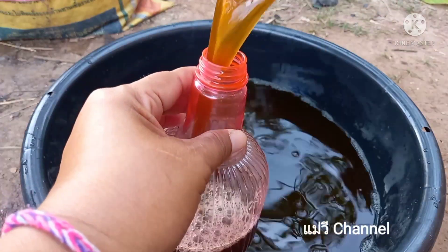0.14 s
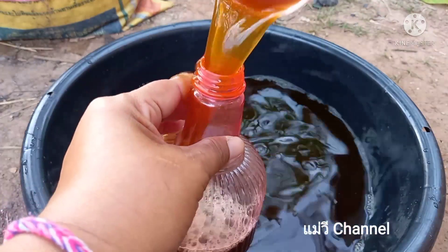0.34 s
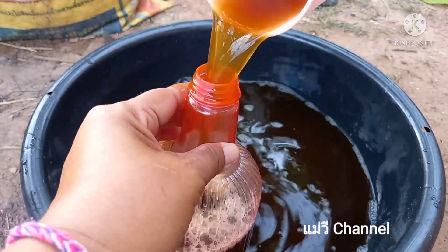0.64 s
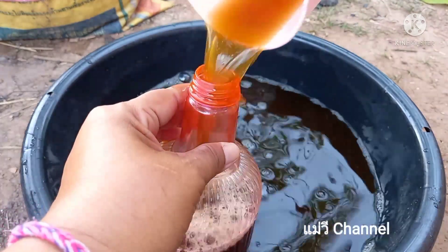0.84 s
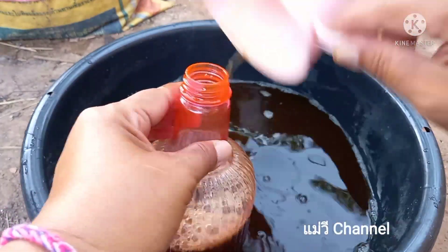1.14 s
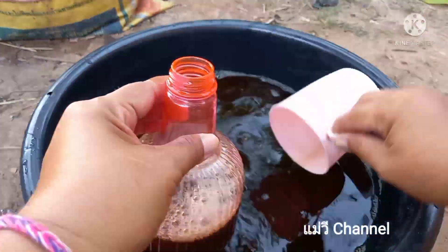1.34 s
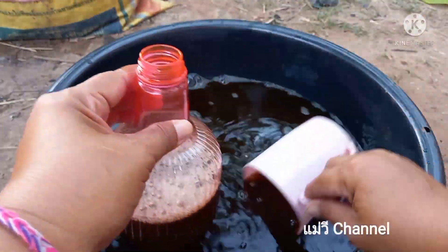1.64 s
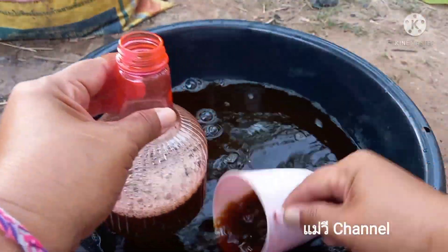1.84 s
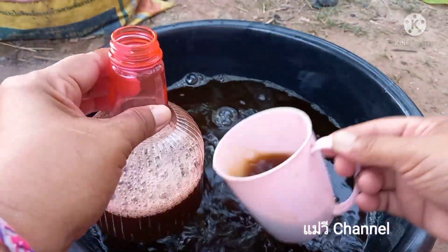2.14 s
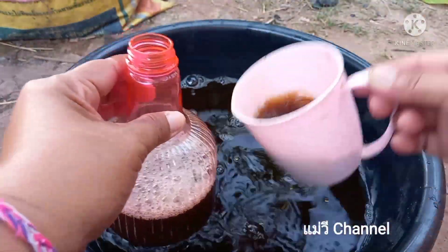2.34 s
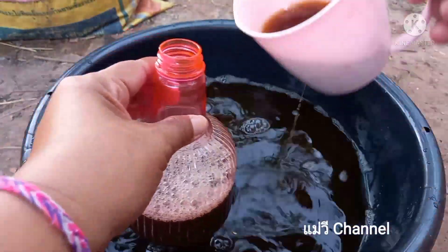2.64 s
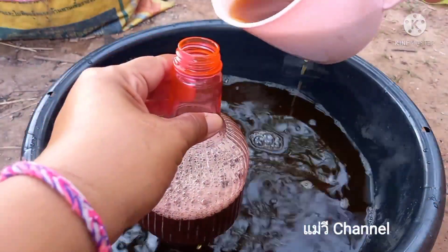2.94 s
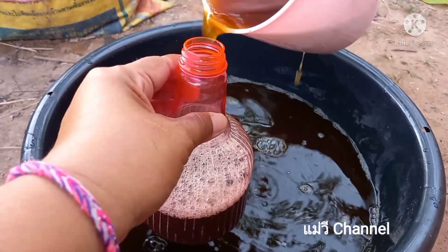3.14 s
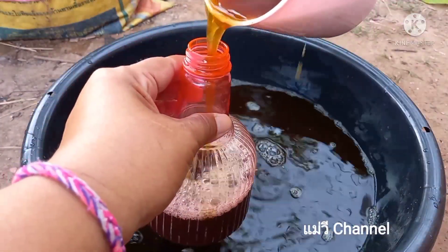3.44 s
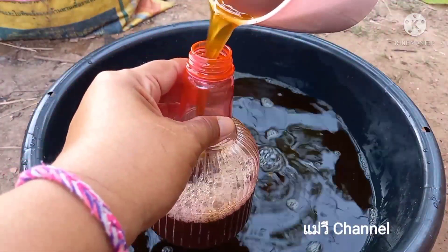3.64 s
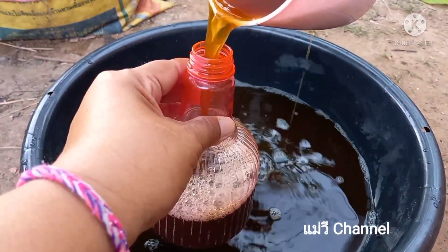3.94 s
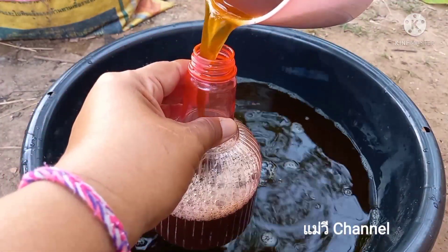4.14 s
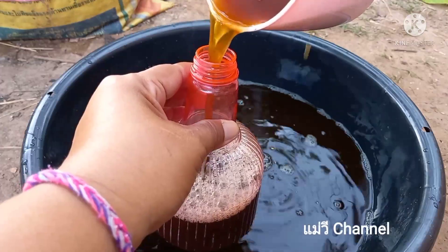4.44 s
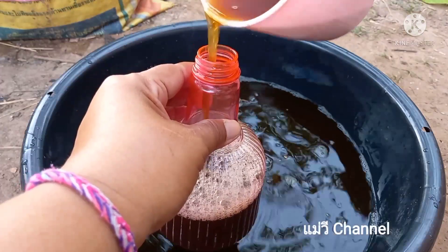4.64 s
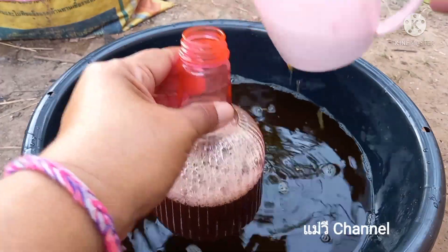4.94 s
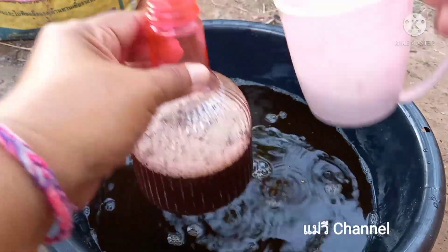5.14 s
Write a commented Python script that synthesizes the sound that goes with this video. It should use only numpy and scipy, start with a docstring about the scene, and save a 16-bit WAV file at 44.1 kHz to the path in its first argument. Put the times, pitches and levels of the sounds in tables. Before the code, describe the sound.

Liquid pours bubbling and splashing into a plastic bottle, a scoop dunks and drips in a basin, then a second, duller pour follows outdoors.

```python
"""Outdoors, at a basin: soapy liquid runs from a plastic scoop into a spray bottle, close to a two-port microphone.
From the start the first pour bubbles, splashes and crackles for over a second, while wind buffets the right port.
Then the scoop is dunked and gulps (1.7 to 1.9 s), runs off and drips; from 3.4 s to 5 s the second pour follows.
Further off, a bird chirps at 0.7, 2.3 and 5.2 s, and a faint insect comes and goes from 2.7 s.
Bubbles are gliding sines, splashes, foam and wind are filtered noise, and the bottle is a set of resonances."""
import sys
import numpy as np
from scipy import signal
from scipy.fft import rfft, irfft
from scipy.io import wavfile
from scipy.ndimage import uniform_filter1d

SR = 44100
rng = np.random.default_rng(int(sys.argv[2]) if len(sys.argv) > 2 else 0)


def wav_record(signal):
    """Record a signal, one row per channel, as 16-bit PCM in the file named by sys.argv[1]."""
    frames = np.transpose(np.atleast_2d(signal))
    bounded = np.clip(frames, -1, 1)
    # unit amplitude maps onto the largest positive 16-bit level
    quanta = np.round(bounded * 32767).astype(np.int16)
    wavfile.write(sys.argv[1], SR, quanta)


N = 232616
T = np.arange(N) / SR  # s


def undb(db):
    """Decibels to gain."""
    return 10 ** (np.asarray(db) / 20)


def unit(x):
    """Scale to rms 1."""
    return x / np.sqrt(np.mean(x ** 2))


def pan(db):
    """Gains of the two ports for a left-minus-right level in dB."""
    return undb(np.array([[db], [-db]]) / 2)


def add(out, s, x):
    """Mix a short sound into out at time s."""
    i = int(np.clip(s * SR, 0, N - 1))
    out[..., i:i + x.shape[-1]] += x[..., :N - i]


def curve(rows, axis=1):
    """Gain over time from a dB column; practically silent outside its span."""
    rows = np.array(rows)
    return undb(np.interp(T, rows[:, 0], rows[:, axis], left=-120, right=-120))


def swell(start, length, attack, release):
    """Gain over time: it rises, holds, then falls by 60 dB in the release time."""
    age = T - start
    return np.clip(age / attack, 0, 1) * undb(-60 * np.maximum(age - length, 0) / release)


def walk(rate):
    """Slow random wandering, spread a little under 1, with rate new values a second."""
    k = int(SR / rate)
    return uniform_filter1d(np.repeat(rng.standard_normal(N // k + 1), k), k)[:N]


def uneven(start, length, rate, count=64):
    """Loosely spaced moments, each with two chance values: rows (s, chance, chance)."""
    rows = rng.standard_normal((count, 3))
    rows[:, 0] = start + (np.arange(count) + .5 + np.tanh(rows[:, 0]) / 2) / rate
    return rows[rows[:, 0] < start + length]


def colour(x, points, size=2048):
    """Causal minimum-phase filter shaped by (hz, level_db) points; white noise keeps its power."""
    hz, db = np.transpose(points)
    f = np.maximum(np.arange(size // 2 + 1) * SR / size, 1)
    cepstrum = irfft(np.log(undb(np.interp(np.log(f), np.log(hz), db))))
    # folding the cepstrum forward makes the response causal
    cepstrum[1:size // 2] *= 2
    cepstrum[size // 2 + 1:] = 0
    response = irfft(np.exp(rfft(cepstrum)))
    return signal.fftconvolve(x, response[None] / np.linalg.norm(response))[:, :x.shape[1]]


def resonate(x, hz, width):
    """One resonance, gain 1 at its centre, width in Hz."""
    return signal.lfilter(*signal.iirpeak(hz, hz / width, fs=SR), x)


def fade(t60, rise, size=6000):
    """Time axis and an envelope that swells and dies away, peak 1."""
    t = np.arange(size) / SR
    env = (1 - np.exp(-t / rise)) * np.exp(-np.log(1000) * t / t60)
    return t, env / env.max()


def bubble(hz, t60, glide, rise, size=6000):
    """A ringing pocket of air; its pitch climbs by the glide share as it nears the surface."""
    t, env = fade(t60, rise, size)
    cycles = hz * np.cumsum(1 + glide * np.minimum(t / t60, 1)) / SR
    return env * np.sin(2 * np.pi * cycles)


def burst(t60, rise):
    """A short spatter of noise."""
    t, env = fade(t60, rise)
    return env * rng.standard_normal(len(t))


def wide_burst(t60, rise):
    """A spatter that differs at the two ports."""
    return np.array([burst(t60, rise) for _ in range(2)])


def swarm(rate, lo_hz, hi_hz, cycles, spread_db, lag_ms, count=9000, size=900):
    """Many small bubbles of uneven size swell over their first cycles and reach the right port a little late."""
    when, pitch, place, strength = rng.random((count, 4)).T[:, :int(rate * N / SR), None]
    hz = lo_hz * (hi_hz / lo_hz) ** pitch
    gain = undb(-spread_db * np.log(np.maximum(strength, .02))) * np.sqrt(hz)
    where = ((when * N).astype(int) + np.arange(size)).ravel()
    out = []
    for lag in (0, lag_ms / 1000 * place):
        turns = hz * np.maximum(np.arange(size) / SR - lag, 0)
        env = (1 - np.exp(-(turns / 2) ** 2)) * np.exp(-np.log(1000) * turns / cycles)
        climb = 1 + .035 * turns / cycles
        rings = gain * env * np.sin(2 * np.pi * turns * climb)
        out.append(np.bincount(where, rings.ravel(), N)[:N])
    return np.array(out)


def steady(x, span=0.078):
    """Hold the mean power near 1 while single grains still stand out; span in s."""
    power = uniform_filter1d(np.mean(x ** 2, axis=0), int(span * SR))
    return x / np.sqrt(power + np.mean(power) / 100)


def ports(x, turn_hz=3000):
    """A close sound at both ports: the lows alike, the treble lagging in phase on the right (an all-pass)."""
    low = signal.lfilter(*signal.butter(1, turn_hz, fs=SR), x)
    return np.array([x, 2 * low - x])


# colour of the distant air: hz, level_db
AIR_COLOUR = [(18, -19), (30, -5.5), (114, 4.5), (164, -9.5), (230, -5.5), (575, -25), (4310, -41.5),
              (5450, -44), (6540, -47.5), (7460, -44.5), (15500, -42.5)]
# the insect's swelling and fading: start_s, level_db (before a random flicker)
INSECT_LEVEL = [(2.7, -94), (3.05, -79.5), (3.45, -71), (3.8, -94), (4.7, -76), (5.2, -78)]
AIR_DB = -50.5


def outdoors():
    """Distant murmur of the air, alike on both ports in the bass, and a faint high insect of narrow noise."""
    mid, side = colour(rng.standard_normal((2, N)), AIR_COLOUR)
    wide = signal.lfilter(*signal.butter(1, 1200, "high", fs=SR), side) + 0.35 * side
    left_right = np.array([[1], [-1]]) * wide / np.std(side)
    air = undb(AIR_DB + walk(7.7)) * (unit(mid) + left_right)
    trill = resonate(rng.standard_normal((2, N)), 6600, 520)
    trill = unit(resonate(trill, 6600, 520))
    return air + trill * curve(INSECT_LEVEL) * undb(1.3 * walk(23))


# bird calls further off: start_s, level_db (before the smearing)
BIRD_CALLS = [(0.655, -41.5), (2.349, -44.5), (5.239, -46.5)]
# pitch path of one call: after_start_s, pitch_hz
CALL_PITCH = [(0, 6550), (0.015, 6925), (0.027, 6030), (.048, 4750), (0.079, 3900)]


def bird():
    """Thin, slightly hoarse falling chirps, smeared by the trees they pass through."""
    song = np.zeros(N)
    after, hz = np.transpose(CALL_PITCH)
    t = np.arange(int(after[-1] * SR)) / SR
    for s, db in BIRD_CALLS:
        pitch = np.interp(t, after, hz) * (1 + .04 * walk(1500)[:len(t)])  # the wobble makes it hoarse
        env = np.minimum(t / 0.016, 1) * (1 - t / after[-1])
        add(song, s, undb(db) * np.sin(2 * np.pi * np.cumsum(pitch) / SR) * env)
    t, env = fade(t60=0.36, rise=0.0096, size=16000)
    trees = env * rng.standard_normal((2, len(t))) / np.linalg.norm(env)
    return undb(-2) * song + signal.fftconvolve(song[None], trees)[:, :N]


# strong eddies hitting the right port: start_s, level_db (before panning), pitch_hz
BUFFET_EDDIES = [(0.047, -19.5, 106), (0.076, -17.5, 84), (0.165, -21.5, 61), (0.2, -16, 97),
                 (0.27, -26, 86), (0.349, -19, 89), (0.55, -33.5, 62), (0.775, -29.5, 84),
                 (0.839, -32.5, 78.6), (2.167, -31, 66.4), (2.442, -24.5, 64.1), (2.645, -28, 74)]
# gusts: start_s, length_s, rumble level_db (before panning)
WIND_GUSTS = [(-0.04, 0.26, -30.5), (.66, 0.12, -45.5), (2.092, 0.358, -46.5), (2.87, .06, -55)]
# colour of the wind rumble: hz, level_db
WIND_COLOUR = [(22, -19), (50, 1.5), (85, 2.5), (130, 1.5), (180, -6), (260, -12.5), (350, -36.5),
               (1200, -77.5)]
GUST_ATTACK_S, GUST_RELEASE_S, CALM_DB = 0.013, 1.14, -65
EDDIES_PER_S, EDDY_DB, EDDY_HZ = 19, -36, 71  # weak eddies in every gust: mean level and middle pitch


def wind():
    """Gusts rumble on each port, more on the right; single eddies shake the right one for a cycle or two."""
    eddies = np.zeros((1, N))
    t = np.arange(SR // 10) / SR
    weak = []
    for start, length, _ in WIND_GUSTS:
        for s, force, pitch in uneven(start, length, EDDIES_PER_S):
            if s > 0:
                weak.append((s, EDDY_DB + 2 * force, EDDY_HZ * np.exp(.15 * pitch)))
    for s, db, hz in BUFFET_EDDIES + weak:
        age = t / 0.0077
        push = (age * np.exp(1 - age)) ** 2
        add(eddies, s, undb(db) * push * np.sin(2 * np.pi * (hz * t + rng.random())))
    flutter = uniform_filter1d(np.abs(eddies), SR // 100) * colour(rng.standard_normal((1, N)), WIND_COLOUR)
    strength = undb(CALM_DB)
    for s, length, db in WIND_GUSTS:
        strength = strength + undb(db) * swell(s, length, GUST_ATTACK_S, GUST_RELEASE_S)
    rumble = colour(rng.standard_normal((2, N)), WIND_COLOUR) * strength
    return undb(-3.5) * pan(-28.5) * (eddies + .5 * flutter) + pan(-10.5) * rumble


# single drops into basin or bottle: start_s, level_db, bubble pitch_hz, tick level_db (levels relative)
SINGLE_DRIPS = [(1.3064, -40, 5530, -52.5), (1.3874, -37, 8200, -52), (1.5741, -38.5, 3960, -50),
                (1.611, -37, 8650, -46.5), (2.1395, -28.5, 3030, -34.5), (2.1748, -28, 3890, -45),
                (2.2371, -19.5, 8400, -48), (2.2468, -27, 9700, -40.5), (2.262, -42, 3030, -36),
                (2.3007, -44, 3122, -43.5), (2.6657, -40, 3090, -61), (2.8725, -39, 1734, -55),
                (3.1565, -38.5, 3115, -65), (3.4423, -37, 2580, -56.5), (3.553, -33.5, 7300, -57.5),
                (4.156, -34.5, 2340, -54), (4.8678, -43, 1910, -68)]
# colour of a drop's impact: hz, level_db
TICK_COLOUR = [(1500, -11.5), (3000, -1.5), (6000, 0.5), (8500, 2.5), (13000, 4.5), (15500, -3.5)]
# a run of drops off the scoop: mean levels (relative, as above) and middle pitch
RUNOFF_S, RUNOFF_LENGTH_S, RUNOFF_PER_S = 2.13, .19, 70
RUNOFF_DB, RUNOFF_TICK_DB, RUNOFF_SCATTER_DB, RUNOFF_HZ = -41, -51, 3, 3600


def drips():
    """A drop ticks on the surface, then its bubble pings upward while a little spray settles."""
    pings, ticks = np.zeros(N), np.zeros(N)
    runoff = []
    for s, force, pitch in uneven(RUNOFF_S, RUNOFF_LENGTH_S, RUNOFF_PER_S):
        scatter_db = RUNOFF_SCATTER_DB * force
        hz = RUNOFF_HZ * np.exp(np.tanh(pitch) / 2)
        runoff.append((s, RUNOFF_DB + scatter_db, hz, RUNOFF_TICK_DB + scatter_db))
    for s, db, hz, tick_db in SINGLE_DRIPS + runoff:
        t60 = .017 * (3000 / hz) ** .6  # small bubbles die sooner
        add(pings, s, undb(db - 3) * bubble(hz, t60, glide=.3, rise=.0008))
        add(ticks, s, undb(tick_db + 5) * burst(t60=.006, rise=.0004))
        add(ticks, s, undb(tick_db - 8) * burst(t60=.03, rise=.0015))
    both = np.array([ticks, np.roll(ticks, 1)])  # one sample later on the right
    return ports(pings, turn_hz=6600) + colour(both, TICK_COLOUR)


# modes of the scoop's wall and hollow: hz, level_db, t60_s
SCOOP_MODES = [(1090, 0, .03), (1680, -1, .016), (2520, -13, .03), (3000, -9, .03), (4160, -15, .016),
               (5400, -19, .012), (8150, -19, .012)]


def scoop_wall():
    """One knock on the plastic: its wall and hollow ring together."""
    return sum(undb(db) * bubble(hz, t60, glide=0, rise=0.00006) for hz, db, t60 in SCOOP_MODES)


# air gulped by the dunked scoop: start_s, level_db (relative)
SCOOP_GULPS = [(1.657, -12.5), (1.732, -31.5), (1.748, -23.5), (1.772, -30), (1.783, -22), (1.898, -29.5),
               (1.926, -22.5)]
# colour of the slapped liquid: hz, level_db
SLAP_COLOUR = [(300, 0), (800, 1.5), (1800, -6.5), (3000, -2.5), (4500, -11), (8500, -18), (12000, -21),
               (15000, -32)]
GULP_HZ, GULP_SCATTER, GULP_KNOCK_DB = 875, 0.033, -11.5  # trapped bubble; wall knock relative to the gulp


def gulps():
    """Trapped air rings as a bubble, churns around that pitch and knocks the scoop's wall."""
    tones, slaps = np.zeros(N), np.zeros((2, N))
    wall = scoop_wall()
    for s, db in SCOOP_GULPS:
        hz = GULP_HZ * np.exp(GULP_SCATTER * rng.standard_normal())
        add(tones, s, undb(db - 2) * bubble(hz, t60=.026, glide=.1, rise=.003))
        add(tones, s, undb(db - 6) * resonate(burst(t60=0.061, rise=0.0054), hz, hz / 2))
        add(tones, s, undb(db + GULP_KNOCK_DB) * wall)
        add(slaps, s, undb(db - 18) * wide_burst(t60=.02, rise=.001))
    return ports(tones) + colour(slaps, SLAP_COLOUR)


# the scoop striking the liquid: start_s, slap level_db, low thud level_db (relative)
SCOOP_SLAPS = [(1.656, -25.5, -19), (1.895, -37.5, -25), (1.922, -25, -32), (1.926, -21, -23)]
SLOSH_DB = 7  # churning liquid under each slap, relative to its thud


def scoop_slaps():
    """The scoop slaps the surface: a low thud, churning liquid, a ringing wall and a spatter."""
    tones, slaps = np.zeros(N), np.zeros((2, N))
    wall = scoop_wall()
    for s, db, thud_db in SCOOP_SLAPS:
        thud = bubble(hz=268.7, t60=0.085, glide=0.039, rise=0.0041)
        thud = thud + bubble(hz=381, t60=0.03, glide=0.13, rise=0.0018)
        slosh = resonate(burst(t60=0.2, rise=0.0022), hz=372, width=122)
        add(tones, s, undb(thud_db - 3.5) * thud)
        add(tones, s, undb(thud_db + SLOSH_DB) * slosh)
        add(tones, s, undb(db + 2) * wall)
        add(slaps, s, undb(db) * wide_burst(t60=0.018, rise=0.0016))
    return ports(tones) + colour(slaps, SLAP_COLOUR)


SURGE_S, SURGE_DB, SURGE_HZ = 1.938, -29.5, 76  # level before panning


def basin_surge():
    """The basin heaves as the full scoop comes up: one deep swell, louder on the left."""
    heave = np.zeros(N)
    add(heave, SURGE_S, undb(SURGE_DB) * bubble(SURGE_HZ, t60=0.083, glide=0, rise=0.019, size=SR // 4))
    return pan(15) * heave


# froth stirred up by the scoop or running off it: start_s, length_s, level_db
FROTH_WASHES = [(1.649, 0.11, -51.5), (1.923, .02, -59.5), (2.127, 0.016, -59), (2.23, 0.054, -63.5)]
# colour of the foam: hz, level_db
FOAM_COLOUR = [(1500, -25), (3000, -5), (4600, -4), (6300, -4.5), (8300, 1), (11000, -8.5), (15000, -15)]
WASH_ATTACK_S, WASH_RELEASE_S = 0.002, 0.76


def froth():
    """The stirred froth fizzes on: a swarm of tiny bubbles over foam-coloured noise."""
    droplets = swarm(rate=900, lo_hz=2000, hi_hz=10000, cycles=22, spread_db=4.5, lag_ms=.3)
    wash = steady(unit(droplets) + undb(-3.5) * colour(rng.standard_normal((2, N)), FOAM_COLOUR))
    stirred = sum(undb(db) * swell(s, length, WASH_ATTACK_S, WASH_RELEASE_S) for s, length, db in FROTH_WASHES)
    return wash * stirred


# resonances of the air in the bottle: hz, width_hz, level_db, left_minus_right_db
BOTTLE_AIR = [(350, 110, -9, 0), (720, 80, -15, 0), (855, 42, 2, 0), (1080, 55, 1, -7), (1260, 150, -2, 0)]


def bottle(x):
    """The air in the bottle answers whatever falls into it."""
    x = signal.lfilter(*signal.butter(2, 1700, fs=SR), x)  # the foam muffles the treble
    return sum(undb(db) * pan(pan_db) * resonate(x, hz, width) for hz, width, db, pan_db in BOTTLE_AIR)


MUFFLE_HZ, MUFFLE_PER_S = 2420, 0.15  # each second the foam takes this further share of the treble


def muffle(x):
    """The thickening head of foam dulls the splashes."""
    treble = signal.sosfiltfilt(signal.butter(3, MUFFLE_HZ, "high", fs=SR, output="sos"), x)
    return x - np.clip(MUFFLE_PER_S * T, 0, 1) * treble


# the two pours, one list each: start_s, bubbling level_db, splashing level_db (relative)
POUR_LEVELS = [
    [(0.0, -48, -45), (0.2, -54, -51.5), (0.42, -63.5, -44.5), (0.62, -64, -61), (0.9, -64.5, -64.5),
     (1.02, -57, -63), (1.27, -67, -65), (1.37, -88, -88)],
    [(3.44, -61, -79), (3.53, -52.5, -66), (3.67, -55.5, -65.5), (3.77, -99, -89), (3.86, -44, -61),
     (3.98, -63.5, -64.5), (4.23, -59, -51.5), (4.4, -65, -62.5), (4.58, -49, -59.5), (4.77, -61.5, -70),
     (4.91, -40, -78), (4.97, -72, -92)],
]
SLUGS_PER_S, SLUG_SCATTER_DB = 26, 3.5
SLUG_DB, SLUG_SPLASH_DB = 9.5, 4  # relative to the pour's bubbling and splashing


def slugs():
    """The stream breaks into small slugs, as strong as the pour at that moment: rows like BIG_SLUGS."""
    rows = []
    for pour in POUR_LEVELS:
        times, bubbling_db, splashing_db = np.transpose(pour)
        for s, depth, force in uneven(times[0], times[-1] - times[0], SLUGS_PER_S):
            glug_db = np.interp(s, times, bubbling_db) + SLUG_DB + SLUG_SCATTER_DB * depth
            splash_db = np.interp(s, times, splashing_db) + SLUG_SPLASH_DB + SLUG_SCATTER_DB * force
            rows.append((s, glug_db, splash_db))
    return rows


# big slugs dropping into the bottle: start_s, glug level_db, splash level_db (relative)
BIG_SLUGS = [(0.094, -49, -35.5), (0.149, -29.5, -28.5), (0.18, -32, -36), (0.404, -30.5, -37),
             (0.538, -60, -39), (0.925, -31.5, -40), (0.948, -22, -41.5), (0.972, -33.5, -39.5),
             (1.15, -40, -57), (1.208, -43, -44.5), (1.262, -39, -50.5), (3.634, -40, -47.5),
             (3.668, -48, -51.5), (3.835, -17, -42), (3.871, -31.5, -40), (4.008, -36, -49),
             (4.251, -48, -58), (4.292, -41, -49.5), (4.427, -31, -60), (4.478, -37, -52.5),
             (4.833, -27.5, -60), (4.882, -18, -73), (4.904, -30, -79)]
# colour of the splashing: hz, level_db
SPLASH_COLOUR = [(600, -10.5), (1100, 1), (1450, -12.5), (1720, -6), (1950, 2.5), (2300, -5), (2900, -2),
                 (3500, -8.5), (5000, -8.5), (9000, -29.5)]
# the whole air of the bottle bounces in its neck; each second its note climbs by this share and weakens
NECK_HZ, NECK_RISE_PER_S, FILL_DB_PER_S = 246.7, 0.0643, 2.46
THUMP_DB, THUMP_SPLASH_DB = -12, 3.5  # the neck's bounce, relative to the glug and to the splash
BLIP_HZ, BLIP_SCATTER, BLIP_DB = 1839, .15, 3.5  # small bubble of a slug; level relative to its splash
# middling bubbles shed within a short time; level relative to the splash
SATELLITES, SATELLITE_S = 3, .03
SATELLITE_HZ, SATELLITE_SCATTER, SATELLITE_DB = 1345, 0.22, -2


def glugs():
    """Each slug traps a big bubble that rings the bottle, and small ones that blip amid fine spray."""
    push, blips, spray = np.zeros(N), np.zeros(N), np.zeros((2, N))
    for s, db, splash_db in BIG_SLUGS + slugs():
        blip_hz = BLIP_HZ * np.exp(BLIP_SCATTER * rng.standard_normal())
        glug = bubble(hz=810, t60=.016, glide=.2, rise=.004) + .38 * burst(t60=.05, rise=.004)
        add(push, s, undb(db) * glug)
        neck_hz = NECK_HZ * (1 + NECK_RISE_PER_S * s)
        thump = (undb(db + THUMP_DB) + undb(splash_db + THUMP_SPLASH_DB)) * undb(-FILL_DB_PER_S * s)
        add(blips, s, thump * bubble(neck_hz, t60=0.056, glide=0.33, rise=0.0041))
        add(blips, s, undb(splash_db + BLIP_DB) * bubble(blip_hz, t60=0.03, glide=.03, rise=0.0016))
        for late, pitch in rng.uniform((0, -1), (SATELLITE_S, 1), (SATELLITES, 2)):
            shed_hz = SATELLITE_HZ * np.exp(SATELLITE_SCATTER * pitch)
            shed = bubble(shed_hz, t60=0.019, glide=0.068, rise=0.0012, size=2000)
            add(blips, s + late, undb(splash_db + SATELLITE_DB) * shed)
        add(spray, s, (undb(splash_db) + undb(db - 26)) * wide_burst(t60=0.06, rise=0.0059))
    splashes = undb(-3.5) * muffle(colour(spray, SPLASH_COLOUR))
    return undb(2) * bottle(push) + ports(blips) + splashes + undb(-12) * colour(spray, FOAM_COLOUR)


# the crackle follows the stream's gain to this power and sinks as the head of foam thickens
FOAM_DB, FOAM_FOLLOWS, FOAM_FADE_DB_PER_S = -37, 0.34, 3
GURGLE_DB, GURGLE_WIDTH_HZ = 6.5, 96.6  # the neck's hollow note: starting level over the bubbling, filter width


def stream():
    """The running liquid drags bubbles under, splashes on the foam, makes it crackle and stirs the bottle's air."""
    big = swarm(rate=260, lo_hz=700, hi_hz=1500, cycles=14, spread_db=3.5, lag_ms=.1)
    small = swarm(rate=950, lo_hz=1100, hi_hz=3100, cycles=50, spread_db=3.3, lag_ms=.45)
    tiny = swarm(rate=1300, lo_hz=3000, hi_hz=14000, cycles=22, spread_db=4.5, lag_ms=.3)
    deep = steady(bottle(unit(big) + undb(1) * rng.standard_normal(N)) + undb(-10) * unit(big))
    splash = steady(colour(unit(small) + undb(-6) * rng.standard_normal((2, N)), SPLASH_COLOUR))
    foam = steady(colour(unit(tiny) + undb(-9) * rng.standard_normal((2, N)), FOAM_COLOUR))
    gurgle = resonate(rng.standard_normal(N), NECK_HZ, GURGLE_WIDTH_HZ)
    gurgle = unit(resonate(gurgle, NECK_HZ, GURGLE_WIDTH_HZ))
    bubbling = sum(curve(pour, axis=1) for pour in POUR_LEVELS)
    splashing = sum(curve(pour, axis=2) for pour in POUR_LEVELS)
    crackling = (splashing + bubbling) ** FOAM_FOLLOWS * undb(FOAM_DB - FOAM_FADE_DB_PER_S * T)
    spurts = undb(2 * walk(35))  # the stream wobbles, so bubbles come in clusters
    hollow = undb(GURGLE_DB - FILL_DB_PER_S * T) * pan(-5) * gurgle * bubbling
    running = undb(-1) * deep * bubbling + undb(3.5) * muffle(splash) * splashing + foam * crackling
    return spurts * running + hollow


def basin_echo(liquid):
    """The treble of the liquid sounds scatters briefly round the basin."""
    t, env = fade(t60=0.15, rise=0.0013)
    basin = env * rng.standard_normal((2, len(t))) / np.linalg.norm(env)
    basin = signal.lfilter(*signal.butter(2, 1200, "high", fs=SR), basin)
    return undb(-7.5) * signal.fftconvolve(liquid, basin, axes=1)[:, :N]


def scene():
    """Wind and garden lie around the close liquid and its scatter in the basin."""
    scoop = gulps() + scoop_slaps() + basin_surge() + froth()
    liquid = drips() + scoop + glugs() + stream()
    return outdoors() + bird() + wind() + liquid + basin_echo(liquid)


def record(dry):
    """The recorder cuts the deepest rumble below 38 Hz and the top above 15.7 kHz."""
    x = signal.sosfilt(signal.butter(4, 38, "high", fs=SR, output="sos"), dry)
    return signal.sosfilt(signal.ellip(10, .2, 70, 15700, fs=SR, output="sos"), x)


dry = scene()
out = record(dry)
wav_record(out)
```